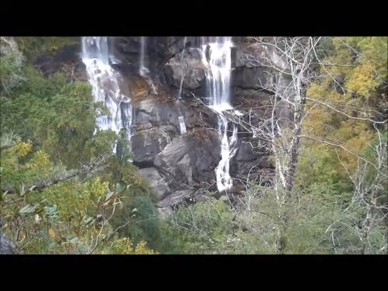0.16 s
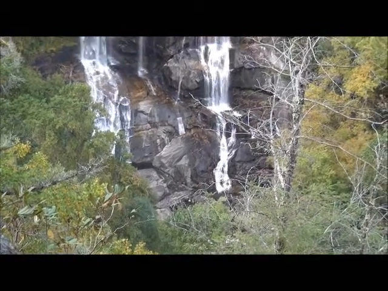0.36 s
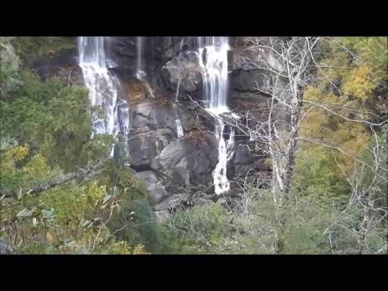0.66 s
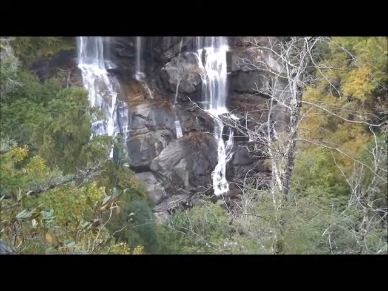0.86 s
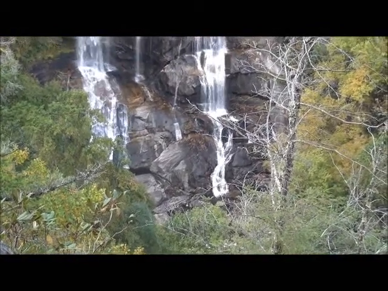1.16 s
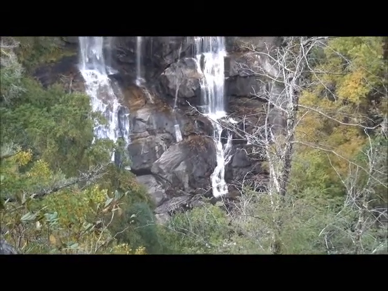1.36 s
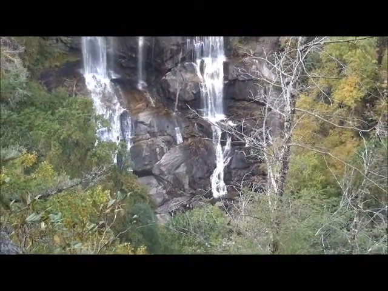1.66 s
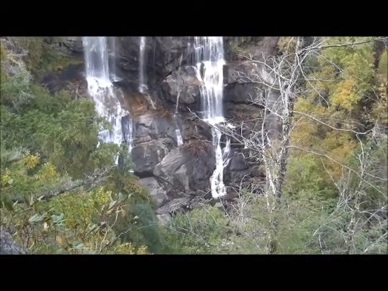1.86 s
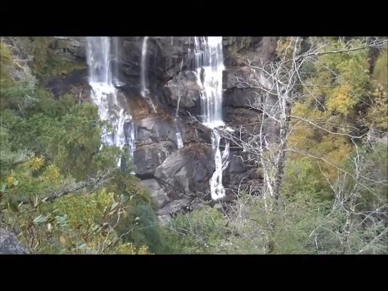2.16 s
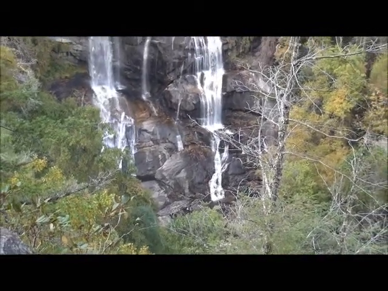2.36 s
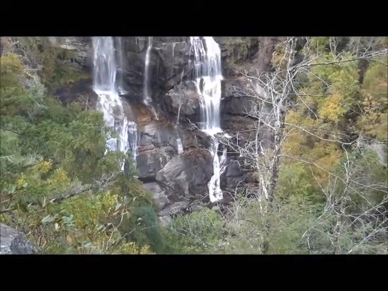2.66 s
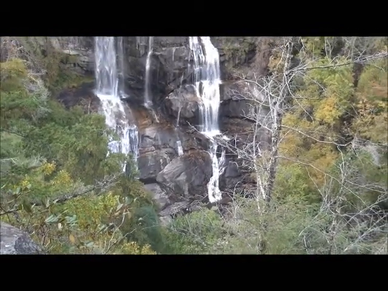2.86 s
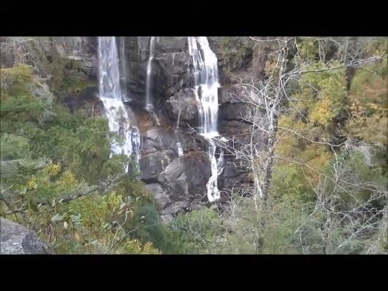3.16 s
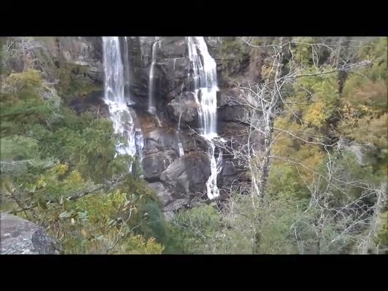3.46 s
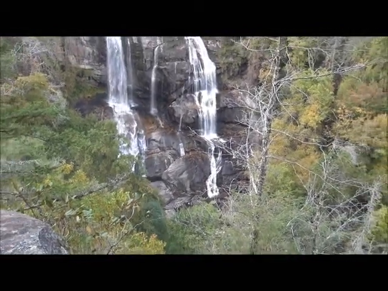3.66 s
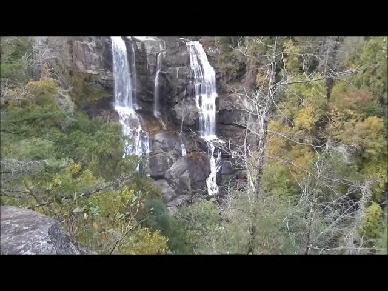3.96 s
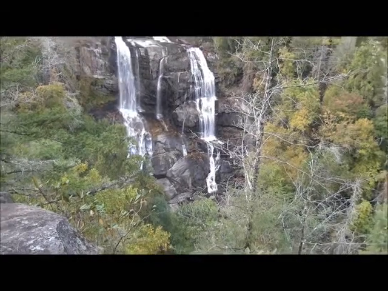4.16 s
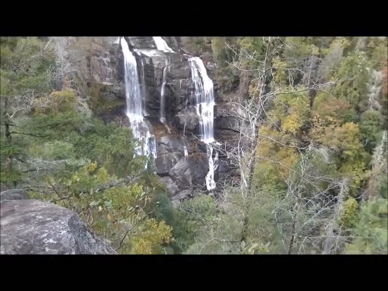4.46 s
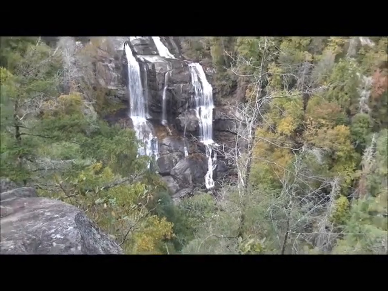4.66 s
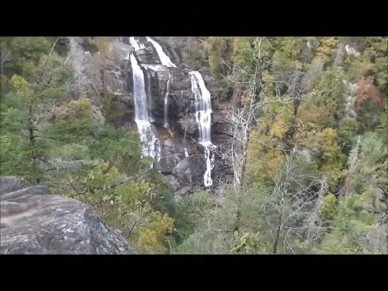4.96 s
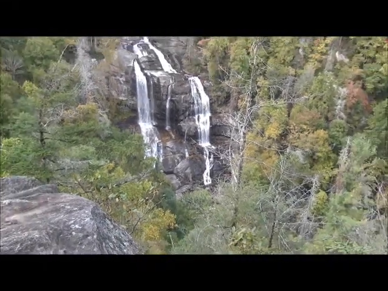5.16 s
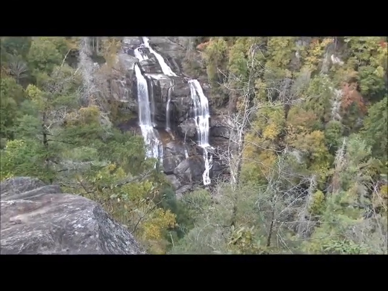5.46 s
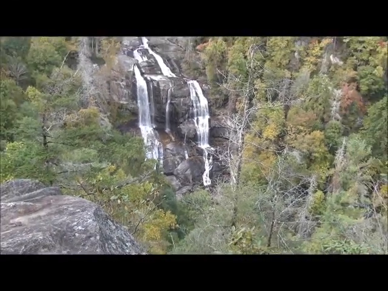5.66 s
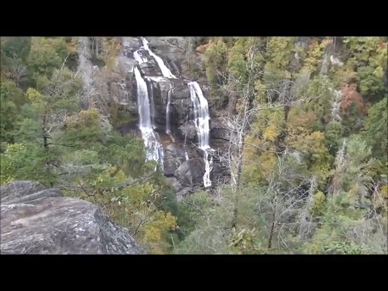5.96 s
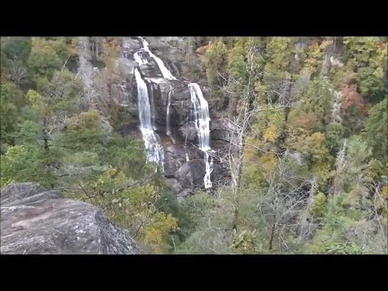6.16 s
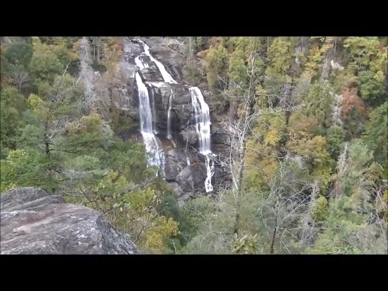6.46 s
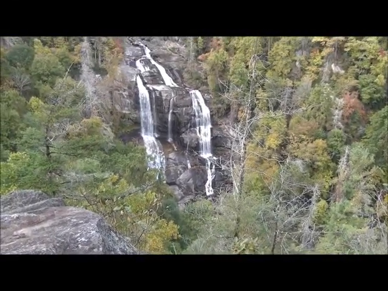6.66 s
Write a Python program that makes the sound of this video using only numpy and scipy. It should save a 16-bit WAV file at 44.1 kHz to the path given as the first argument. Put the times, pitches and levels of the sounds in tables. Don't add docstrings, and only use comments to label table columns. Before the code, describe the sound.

Steady distant waterfall rush, broad and dense with soft low rumble and dulled spray hiss, drifting slightly in loudness; one tiny plastic tick midway.

```python
import sys
import numpy as np
from scipy import signal
from scipy.fft import rfft, irfft, next_fast_len
from scipy.io import wavfile
from scipy.ndimage import uniform_filter1d, map_coordinates

SR = 44100
rng = np.random.default_rng(int(sys.argv[2]) if len(sys.argv) > 2 else 0)


def file_out(sig):
    cols = np.atleast_2d(sig).T
    lim = np.clip(cols, -1, 1)
    pcm = np.round(lim * 32767).astype(np.int16)
    wavfile.write(sys.argv[1], SR, pcm)


def magnitude_from_level(level_db):
    exponent = np.asarray(level_db, float) / 20
    return 10 ** exponent


N = 301203
TIME = np.arange(N) / SR

# time in seconds, level of the roar
# in dB.
SWELL = [(0, -23), (.45, -21.8), (.7, -23), (1.2, -22), (1.5, -22.5), (2.2, -22), (2.45, -21), (2.85, -22),
         (3.15, -21), (3.5, -23.5), (4.05, -24), (4.65, -22.5), (4.95, -24), (5.4, -22), (5.9, -21.5),
         (6.2, -21.5), (6.5, -22.5), (6.83, -22)]


def unit(x):
    return x / np.sqrt(np.mean(x ** 2) + 1e-20)


def along(points, hz):
    point_hz, point_db = np.transpose(points)
    return np.interp(np.log(hz + 1), np.log(point_hz + 1), point_db, left=-120, right=-120)


def swell_level():
    return np.interp(TIME, *np.transpose(SWELL))


def wobble(rate):
    knots = rng.standard_normal(int(N * rate / SR) + 4)
    return map_coordinates(knots, [TIME * rate])


def rush(spectrum, patchy_db):
    # pitch in Hz, level in dB.
    port_difference = [(60, -42), (200, -40), (330, -32), (700, -28), (1290, -21.5), (2400, -21),
                       (4400, -20), (15000, -22)]
    noise = signal.stft(rng.standard_normal((2, N + 512)), nperseg=512)[2]
    patches = uniform_filter1d(rng.standard_normal(noise.shape[1:]), size=6, axis=0)
    patches = uniform_filter1d(patches, size=12, axis=1)
    pair = signal.istft(noise * magnitude_from_level(patchy_db * unit(patches)), nperseg=512)[1]

    size = next_fast_len(N + 8192)
    hz = np.fft.rfftfreq(size, 1 / SR)
    difference_db = along(port_difference, np.clip(hz, 60, 15000))
    shape = magnitude_from_level(along(spectrum, hz) + [0 * hz, difference_db])
    mid, side = irfft(rfft(pair, size) * shape, size)[:, :N]
    return unit(np.array([mid + side, mid - side]))


def ledge_roar(level_db):
    # pitch in Hz, level in dB per Hz.
    ledge_spectrum = [(200, -37), (300, -9.5), (400, -3), (480, -0.5), (950, -1.5), (1600, -2.5),
                      (2300, -5.5), (3200, -15), (5000, -32)]
    return magnitude_from_level(level_db) * rush(ledge_spectrum, patchy_db=0.48)


def pool_rumble(level_db):
    # pitch in Hz, level in dB per Hz.
    pool_spectrum = [(25, -25), (60, -13), (80, -10), (88, -8), (132, -5), (146, -2.5), (215, 0),
                     (270, -4.5), (340, -7.5), (520, -46)]
    return magnitude_from_level(level_db) * rush(pool_spectrum, patchy_db=-0.5)


def spray_hiss(level_db):
    # pitch in Hz, level in dB per Hz.
    spray_spectrum = [(1500, -18), (2400, -2.5), (2900, -1), (3600, -3.5), (4300, -5.5), (5000, -9.5),
                      (6500, -18.5), (8000, -27), (10000, -38.5), (11300, -59), (13000, -60)]
    return magnitude_from_level(level_db + 0.1 * wobble(22)) * rush(spray_spectrum, patchy_db=0.27)


def waterfall():
    roar_db = swell_level() - 0.75
    mean_db = roar_db.mean()
    swell_db = roar_db - mean_db
    surge_db = 0.047 * wobble(11) + 0.15 * wobble(30)
    roar = ledge_roar(roar_db + surge_db)
    pool = pool_rumble(mean_db - 12 + 0.81 * swell_db + surge_db)
    spray = spray_hiss(mean_db - 6 + 0.97 * swell_db + surge_db)
    return pool + roar + spray


def grip_rubs():
    # start in seconds, stop in seconds, level at the end in dB.
    rubs = [
        (.25, .59, -70),
        (1.9, 2.5, -75),
        (4.72, 4.84, -66),
        (4.6, 5.3, -71),
    ]
    # pitch in Hz, level in dB per Hz.
    skin_spectrum = [(9000, -25), (10500, -2), (12000, 0), (13200, -6), (14500, -14), (15500, -30)]
    stroke = np.zeros(N)
    for start, stop, db in rubs:
        rise = np.interp(TIME, [start, stop - .01, stop], [0, 1, 0])
        stroke += magnitude_from_level(db) * rise ** 0.54
    return stroke * rush(skin_spectrum, patchy_db=3)


def case_ticks():
    # time in seconds, peak level in dB.
    ticks = [
        (3.043, -40),
    ]
    # pitch in Hz, level in dB, time to fade by 60 dB in seconds.
    case_parts = [(10000, -3, .012), (10600, 0, .025), (11100, -2, .02), (11900, -13, .006),
                  (12800, -11, .005), (13800, -12, .005), (15200, -5, .03), (15550, -7, .025)]
    out = np.zeros(N + SR)
    t = TIME[:SR // 10]
    for start, peak_db in ticks:
        ring = np.zeros(len(t))
        for hz, level, fade in case_parts:
            ring_db = level + rng.normal(0, 1.5) - 60 * t / fade
            ring += magnitude_from_level(ring_db) * np.sin(2 * np.pi * hz * t)
        out[round(start * SR):][:len(t)] += magnitude_from_level(peak_db - 9) * ring
    return out[:N]


def circuit_hiss():
    # pitch in Hz, level in dB per Hz.
    hiss_spectrum = [(6000, -22), (10500, 1.5), (11200, -3), (11900, 0), (13500, -3), (14500, -4),
                     (15000, -10), (15800, -9)]
    level_db = swell_level() - 42 + 0.3 * wobble(2.9)
    return magnitude_from_level(level_db) * rush(hiss_spectrum, patchy_db=0.5)


def drum_whine():
    # pitch in Hz, rms level in dB.
    drum_tones = [(13186, -99), (13426, -90), (13606, -92), (13666, -84), (13726, -81), (13786, -93),
                  (13966, -93), (15734, -92)]
    whine = np.zeros(N)
    for hz, db in drum_tones:
        tone = np.sin(2 * np.pi * (hz * TIME + rng.random()))
        whine += np.sqrt(2) * magnitude_from_level(db) * tone
    return whine


def scene():
    camera = grip_rubs() + case_ticks() + circuit_hiss() + drum_whine()
    return waterfall() + camera


def top_cut(x):
    return signal.sosfilt(signal.butter(12, 15740, fs=SR, output="sos"), x)


def record(dry):
    ceiling = .46
    rounded = dry / (1 + np.abs(dry / ceiling) ** 5) ** (1 / 5)
    return top_cut(rounded)


dry = scene()
out = record(dry)
file_out(out)
```